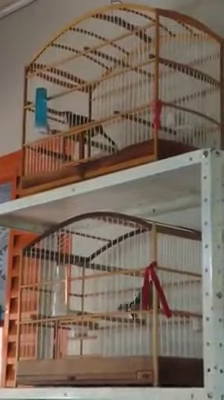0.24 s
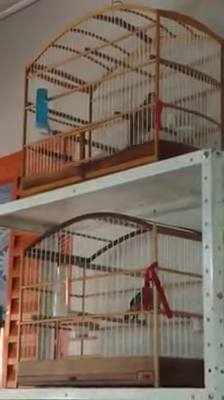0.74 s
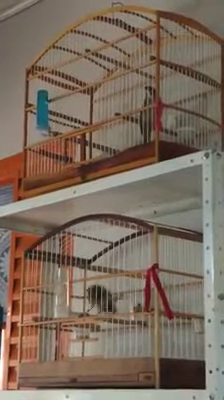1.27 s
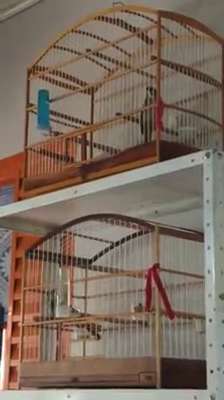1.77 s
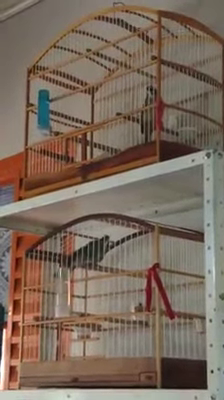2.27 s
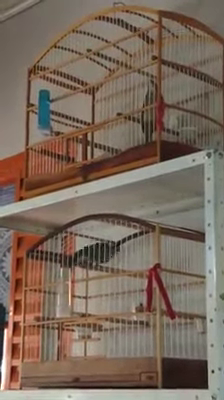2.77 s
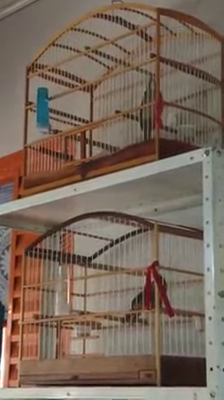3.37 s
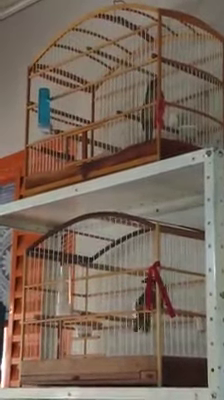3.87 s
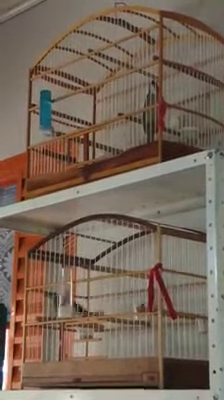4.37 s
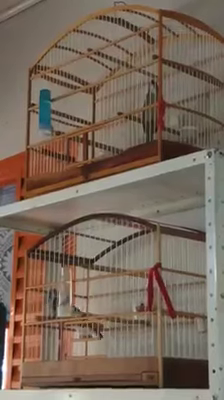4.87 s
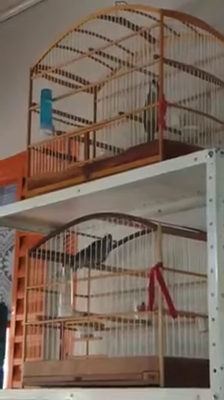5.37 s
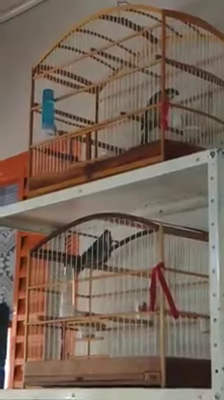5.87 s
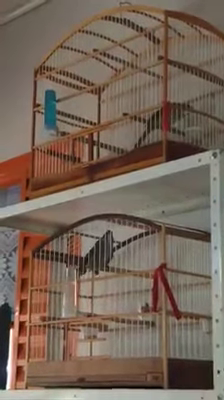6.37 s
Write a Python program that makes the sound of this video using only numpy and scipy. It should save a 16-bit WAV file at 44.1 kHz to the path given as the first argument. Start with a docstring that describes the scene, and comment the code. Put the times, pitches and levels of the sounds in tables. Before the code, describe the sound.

Soft room noise with a faint low hum runs throughout in a bare, echoing room. Small birds hop and flutter lightly in their cages from the start. At about 0.7 seconds one gives a sharp, loud chip. Faint wing rustles, a tiny peep near 1.6 seconds, and light ticks and perch landings follow. From about 2.9 to 4.3 seconds the bird sings four falling whistles, each starting higher and lasting longer, with raspy low notes between and after them. The last whistle, near 3.8 seconds, is the loudest and carries a thin, high ping. A flutter and a landing come around 4.4 seconds, then another sharp chip at 5.4. Soft hops, rustles and ticks on the bars continue until the end at about 6.6 seconds. The background noise dips under each loud note and slowly swells back.

```python
"""In a bare, echoing room a caged songbird gives a sharp chip, a phrase of falling whistles, another chip.
Each note is a gliding near-sine from the syrinx, roughened by uneven vibration, with a hiss of breath.
Between notes, birds hop, flutter and tick against perches and bars, over room noise and a low hum.
Automatic gain control ducks the room noise under each loud note and lets it swell back."""
import sys
import numpy as np
from scipy import signal
from scipy.fft import rfft, irfft, next_fast_len
from scipy.io import wavfile
from scipy.ndimage import uniform_filter1d

SR = 44100
rng = np.random.default_rng(int(sys.argv[2]) if len(sys.argv) > 2 else 0)


def generate_wav(signal):
    """Clip the signal to [-1, 1] and save it as 16-bit WAV at the path in sys.argv[1]."""
    frames = np.transpose(np.atleast_2d(signal))
    scaled = np.clip(frames, -1, 1) * 32767
    pcm = np.round(scaled).astype(np.int16)
    wavfile.write(sys.argv[1], SR, pcm)


N = 292824
TIME = np.arange(N) / SR


def from_db(db):
    """Amplitude ratio: a factor of ten for every 20 dB."""
    return 10 ** (np.asarray(db) / 20)


def rms_one(x):
    """Normalisation to unit mean power."""
    return x / np.sqrt(np.mean(x ** 2) + 1e-20)


def envelope(points):
    """Amplitude envelope, linear in decibels between (time_s, level_db) points."""
    return from_db(np.interp(TIME, *np.transpose(points)))


def at_hz(points, hz):
    """Interpolation on a logarithmic frequency axis."""
    point_hz, value = np.transpose(points)
    return np.interp(np.log(np.maximum(hz, 1)), np.log(point_hz), value)


def coloured(spectrum, size=N):
    """Spectral shaping: white noise filtered to the given spectrum, at unit power."""
    padded = next_fast_len(size)
    gain = from_db(at_hz(spectrum, np.fft.rfftfreq(padded, 1 / SR)))
    return rms_one(irfft(rfft(rng.standard_normal(padded)) * gain, padded)[:size])


def wobble(rate_hz, size):
    """Random modulation: low-passed noise of about unit variance."""
    lowpass = signal.butter(2, rate_hz, fs=SR, output="sos")
    slow = signal.sosfilt(lowpass, rng.standard_normal(size + SR // 4))
    return rms_one(slow[SR // 4:])[:size]


# stereo width: frequency_hz, side_minus_mid_db
STEREO_WIDTH = [(60, 1.5), (250, -6.5), (480, -4.5), (1000, -17), (1450, -5.5), (1900, -6.5), (2350, -4.5),
                (2900, -2.5), (3500, -7), (6300, -1.5), (7500, -2), (15000, 3)]
# stereo balance: frequency_hz, left_minus_right_db
STEREO_BALANCE = [(200, 2), (1000, 0), (2000, -1.5), (2600, -1.5), (3200, -1), (5500, -1), (8000, 0),
                  (15000, -1.5)]

def diffuse_field(mid, side):
    """Partial coherence: the sum and difference of two unrelated signals give a diffuse left and right."""
    size = next_fast_len(len(mid))
    hz = np.fft.rfftfreq(size, 1 / SR)
    width, sign = from_db(at_hz(STEREO_WIDTH, hz)), np.array([[1], [-1]])
    pair = (rfft(mid, size) + sign * width * rfft(side, size)) / np.sqrt(1 + width ** 2)
    balance = from_db(sign * at_hz(STEREO_BALANCE, hz) / 2)
    return irfft(pair * balance, size)[:, :len(mid)]


# spectrum of the room noise: frequency_hz, relative_db
AIR_SPECTRUM = [(25, -33), (45, -12.5), (62, 13.5), (85, 1.5), (230, 4), (400, -2), (1000, -5), (1700, -7),
                (2200, -17.5), (3300, -9), (4700, -17), (6300, -12), (7100, -21), (15500, -19)]
# envelopes of the room noise and the hum: time_s, level_db
AIR_LEVELS = [(0, -53), (1.2, -56), (1.9, -52), (2.6, -55.5), (4.0, -52.5), (5.2, -54.5), (6.1, -56),
              (6.64, -52.5)]
HUM_LEVELS = [(0, -62.5), (1.4, -76), (1.899, -57.5), (2.399, -58), (2.602, -78.5), (6.64, -79.5)]

def background(hum_hz=60.2, waver_hz=10):
    """Diffuse room noise, with a low hum that wavers by random frequency modulation."""
    air = diffuse_field(coloured(AIR_SPECTRUM), coloured(AIR_SPECTRUM))
    hum = np.sin(2 * np.pi * np.cumsum(hum_hz + waver_hz * wobble(16, N)) / SR)
    return envelope(AIR_LEVELS) * air + envelope(HUM_LEVELS) * hum


def off_axis(x, beam_hz=7500):
    """Directivity: the treble of the direct sound is partly beamed away from the microphones."""
    return signal.sosfilt(signal.butter(1, beam_hz, fs=SR, output="sos"), x)


# reverberation time: frequency_hz, t60_s
ROOM_DECAY = [(200, 0.094), (1000, 0.94), (1900, 0.81), (2800, 0.71), (5500, 0.69), (9000, .55),
              (15000, 0.17)]

def room(x, early_t60_s=0.25, late_db=-2.0, echoes_per_s=700, gap_s=0.0028, pan_db=-2.5):
    """Reverberation: direct sound, sparse reflections from shelf and walls, then a dense, dulling tail."""
    t = TIME[:SR]
    hz, age, cells = signal.stft(rng.standard_normal((2, SR)), SR, nperseg=256)
    decay = from_db(-60 * age / at_hz(ROOM_DECAY, hz)[:, None])
    late = signal.istft(cells * decay, SR)[1][:, :SR]
    late *= np.clip((t - gap_s) / 0.029, 0, 1)
    late *= np.sqrt(2 * np.log(1000) / (SR * at_hz(ROOM_DECAY, 2600)))   # normalise at the song's pitch
    polarity = rng.choice([-1, 1], (2, SR))
    arrivals = (rng.random((2, SR)) < echoes_per_s / SR) * (t > gap_s)
    early = polarity * arrivals * from_db(-60 * t / early_t60_s)
    early /= np.sqrt(np.sum(early ** 2, axis=1, keepdims=True))
    response = diffuse_field(*(early + from_db(late_db) * late))[:, :SR * 9 // 10]
    direct = off_axis(x) * from_db(np.array([[1], [-1]]) * pan_db / 2)
    return direct + signal.fftconvolve(x[None], response, axes=1)[:, :N]


# spectrum of claws or feathers scraping in the cage: frequency_hz, relative_db
SCRAPE_SPECTRUM = [(200, -18), (800, -4), (1600, 2.5), (2200, -5), (3200, 5), (4200, 0.5), (4700, -9.5),
                   (5400, -1), (6500, -3.5), (7000, -14.5), (8300, -8), (11000, -24.5), (15500, -21)]
# wing rustles: centre_s, half_length_s, level_db
FLUTTERS = [(.32, .05, -56), (.65, .03, -61), (1.505, .05, -57), (1.76, .06, -58.5), (2.474, .03, -85),
            (4.35, 0.07, -51.5), (5.318, 0.036, -58.5), (6.048, 0.026, -49), (6.515, .12, -64.5)]

def flutters(stroke_hz=28, stroke_db=2.1):
    """Friction noise: feathers brush the air and the bars in uneven strokes."""
    swell = sum(from_db(db) * np.exp(-.5 * ((TIME - s) / half) ** 2) for s, half, db in FLUTTERS)
    return swell * from_db(stroke_db * wobble(stroke_hz, N)) * coloured(SCRAPE_SPECTRUM)


# resonances of the cage floor and of the bars: frequency_hz, relative_db
FLOOR_SPECTRUM = [(80, -19.5), (230, 6.5), (420, -3.5), (800, -5), (1500, -22), (3000, -21)]
BAR_SPECTRUM = [(3000, -32.5), (6200, -2), (7100, -13.5), (8400, -3.5), (10400, -8), (11300, -5.5),
                (12200, -4), (13000, -10.5), (14200, -6.5), (15500, -16.5)]
# feet landing on a perch: start_s, strength_db, relative_thud_db
HOPS = [(.002, -36, -12.5), (0.443, -42, -9), (.959, -46, -23), (2.409, -48, -1.5), (2.606, -37.5, -7),
        (2.781, -39, -10.5), (4.368, -38.5, -31), (5.726, -36.5, 1.5), (6.425, -45, -10.5)]
# beak and claws on the bars: start_s, strength_db, decay_s (time to fall 20 dB)
TICKS = [(2.062, -55, .018), (2.113, -47.5, 0.012), (3.272, -37, .06), (5.314, -51.5, 0.055),
         (6.354, -57.5, .08)]

def taps(usual_hop_db=-39.5, hop_decay_s=.11, hop_ring_db=-11.5, tick_thud_db=-17, tick_ring_db=10.5):
    """Impact excitation: a contact scrapes, the floor thuds and the bars ring, all dying exponentially."""
    scrape, thud, ring = coloured(SCRAPE_SPECTRUM), coloured(FLOOR_SPECTRUM), coloured(BAR_SPECTRUM)
    # harder landings rattle longer
    hops = [(s, db, hop_decay_s * from_db(0.61 * (db - usual_hop_db)), thud_db, hop_ring_db)
            for s, db, thud_db in HOPS]
    ticks = [(*tick, tick_thud_db, tick_ring_db) for tick in TICKS]
    out = np.zeros(N)
    for start_s, strength_db, decay_s, thud_db, ring_db in hops + ticks:
        start = round(start_s * SR)
        span = slice(start, min(start + SR // 2, N))
        age = TIME[span] - TIME[start]
        contact = scrape[span] + from_db(thud_db) * thud[span] + from_db(ring_db) * ring[span]
        out[span] += from_db(strength_db - 20 * age / decay_s) * contact / 2
    return out


def ping(start_s=3.835, pitch_hz=12960, level_db=-32.5, t60_s=.35):
    """A damped sinusoid: one thin, high ping during the longest whistle."""
    age = np.maximum(TIME - start_s, 0)
    return from_db(level_db - 60 * age / t60_s) * np.sin(2 * np.pi * pitch_hz * age)


def glide(length_s, top_hz, end_hz, peak_db, crest_s, attack_s, hold_s, fade_db):
    """Frequency sweep and envelope: pitch arches to a crest, then glides; level swells, holds and fades."""
    scoop, sink_exponent, swell_exponent = 0.072, .86, 2.04
    t = np.arange(round(length_s * SR)) / SR
    arch = 1 - scoop * np.clip(1 - t / crest_s, 0, 1) ** 2
    sunk = np.clip((t - crest_s) / max(length_s - crest_s, 1 / SR), 0, 1) ** sink_exponent
    swell_db = 20 * swell_exponent * np.log10(np.clip(t / attack_s, 1e-6, 1))
    faded = np.clip((t - attack_s - hold_s) / max(length_s - attack_s - hold_s, 1 / SR), 0, 1)
    return top_hz * arch * (end_hz / top_hz) ** sunk, peak_db + swell_db - fade_db * faded


# weighting of the overtones by where they fall: frequency_hz, gain_db
OVERTONE_SPECTRUM = [(3300, -1.5), (4000, 0), (4650, -10), (5300, -12), (6200, -5), (7000, -36),
                     (8300, -6.5), (9300, -8.5), (10400, -46), (12000, -27), (13200, -5), (14200, -10.5),
                     (15500, -35.5)]
# air rushing through the syrinx and open beak: frequency_hz, relative_db
BREATH_SPECTRUM = [(1500, -31), (3000, 5), (4100, 2), (4700, -14), (5500, -11.5), (6500, -1.5),
                   (7200, -33.5), (8400, 1), (9600, 1.5), (10600, -15.5), (12200, -6), (12900, 13.5),
                   (13900, 0.5), (15000, -32.5)]

def syrinx(start_s, hz, level_db, overtone_db, hiss_db, roughness, tilt_db, jitter_hz=450, buzz_hz=87):
    """Frequency and amplitude modulation: an unsteady membrane shakes a near-sine and makes it buzz."""
    start = round(start_s * SR)
    end = start + len(hz)
    t = TIME[:len(hz)]
    # the slack membrane of the low notes vibrates less evenly
    unevenness = roughness * (2600 / hz) ** 1.8
    shaken_hz = hz * (1 + 0.064 * unevenness * wobble(jitter_hz, len(t)))
    phase = 2 * np.pi * np.cumsum(shaken_hz) / SR
    tone = np.sin(phase)
    # the harder the bird pushes, the richer the tone
    effort_db = .25 * (level_db - level_db.max())
    for k in range(2, 6):
        harmonic_db = overtone_db + effort_db + at_hz(OVERTONE_SPECTRUM, k * hz) - tilt_db * (k - 4)
        tone += from_db(harmonic_db) * np.sin(k * phase + .3 * wobble(jitter_hz, len(t)))
    fade = np.clip(np.minimum(t, t[-1] - t) / .003, 0, 1)
    buzz_db = 8.0 * unevenness * np.sin(2 * np.pi * buzz_hz * t)
    gain = fade * from_db(level_db + buzz_db)
    # the airflow, and its hiss, is greatest in the middle of the note
    hiss = from_db(hiss_db) * np.hanning(len(t)) * coloured(BREATH_SPECTRUM, len(t))
    return np.pad(np.sqrt(2) * tone * gain + hiss, (start, N - end))


# low notes: start_s, length_s, top_hz, end_hz, level_db, overtone_db, hiss_db, roughness
RASPS = [(0.725, 0.0179, 2034, 1740, -25.5, -32.5, -69.5, 0.3),
         (2.865, 0.15, 1966, 1834, -32, -15, -54, 0.42), (3.288, 0.083, 2145, 1853, -21, -32, -38, 0.2),
         (3.640, 0.049, 2090, 1870, -28.5, -32.5, -45.5, 0.3),
         (4.105, .150, 2165, 1848, -23, -36.5, -43, 0.41), (6.04, 0.05, 1636, 1618, -53.5, 0.5, -78, 0.7)]

def rasps(attack_share=0.26, hold_share=0.33):
    """Irregular vibration at the bottom of the bird's range, mostly under or just after a louder note."""
    out = np.zeros(N)
    for start_s, length_s, top_hz, end_hz, level_db, *voice in RASPS:
        contour = glide(length_s, top_hz, end_hz, level_db, crest_s=0.0028,
                        attack_s=attack_share * length_s, hold_s=hold_share * length_s, fade_db=7.5)
        out += syrinx(start_s, *contour, *voice, tilt_db=4)
    return out


# sharp chips: start_s, length_s, top_hz, end_hz, level_db, fade_db, overtone_db
CHIPS = [(.695, 0.028, 3074, 2078, -4.5, 21.5, -29.5), (3.486, 0.051, 3020, 2097, -10.5, 13, -19.5),
         (5.37, 0.038, 3180, 2252, -4, 11, -26)]

def chips():
    """Fast frequency sweeps: a short, steep fall in pitch is heard as a chip."""
    out = np.zeros(N)
    for start_s, *shape, fade_db, overtone_db in CHIPS:
        contour = glide(*shape, crest_s=0.011, attack_s=0.016, hold_s=0.0027, fade_db=fade_db)
        out += syrinx(start_s, *contour, overtone_db, hiss_db=-61, roughness=0.081, tilt_db=7)
    return out


# whistled notes: start_s, length_s, top_hz, end_hz, level_db, crest_s, attack_s, hold_s, fade_db,
# overtone_db, hiss_db, roughness
WHISTLES = [ (1.593, 0.052, 2887, 2920, -42.5, 0.009, 0.007, 0.0072, 8, -10.5, -77, 0.62),
            (2.874, 0.12, 2554, 2095, -27.5, .024, 0.023, 0.021, 6.5, -30.5, -44, .5),
            (3.152, 0.14, 2667, 2120, -7, 0.023, .030, .003, 24, -28.5, -32, 0.31),
            (3.434, .199, 3100, 2172, -4, .038, 0.03, 0.061, 21.5, -33.5, -34, 0.08),
            (3.75, 0.3, 4118, 2340, 0, 0.0038, 0.091, 0.041, 18, -34.5, -43.5, .05), ]

def whistles():
    """Slow frequency sweeps: after a soft peep, falling notes start higher and last longer each time."""
    return sum(syrinx(start_s, *glide(*shape), overtone_db, hiss_db, roughness, tilt_db=1.8)
               for start_s, *shape, overtone_db, hiss_db, roughness in WHISTLES)


def scene(throat_cutoff_hz=1680):
    """Superposition of song and cage sounds in the room; the small throat acts as a high-pass filter."""
    throat = signal.butter(8, throat_cutoff_hz, "high", fs=SR, output="sos")
    song = signal.sosfilt(throat, chips() + whistles() + rasps())
    return room(song + taps() + flutters() + ping()) + background()


def microphones(x, centre_hz=1950, width_hz=270, mid_db=-3.5, side_db=12.0):
    """Phase opposition between two microphones: in one narrow band the centre sinks and the sides rise."""
    size = next_fast_len(N)
    band = np.exp(-((np.fft.rfftfreq(size, 1 / SR) - centre_hz) / width_hz) ** 2)
    mid = irfft(rfft(x[0] + x[1], size) * from_db(mid_db * band), size)[:N] / 2
    side = irfft(rfft(x[0] - x[1], size) * from_db(side_db * band), size)[:N] / 2
    return np.array([mid + side, mid - side])


def gain_control(x, threshold_db=-16.5, strength=0.7, release_db_per_s=11.5, attack_s=0.0014):
    """Dynamic compression: the gain drops quickly under loud sound and creeps back."""
    power = uniform_filter1d(np.mean(x ** 2, axis=0), SR // 100)
    level_db = 10 * np.log10(np.maximum(power, 1e-12))
    cut_db = strength * np.maximum(level_db - threshold_db, 0)
    held_db = np.maximum.accumulate(cut_db + release_db_per_s * TIME) - release_db_per_s * TIME
    pole = np.exp(-1 / (attack_s * SR))
    return x * from_db(-signal.lfilter([1 - pole], [1, -pole], held_db))


def record(dry, cutoff_hz=15750):
    """Band limiting: a steep low-pass follows the microphones and the gain control."""
    levelled = gain_control(microphones(dry))
    return signal.sosfilt(signal.ellip(12, .1, 80, cutoff_hz, fs=SR, output="sos"), levelled)


dry = scene()
out = record(dry)
generate_wav(out)
```